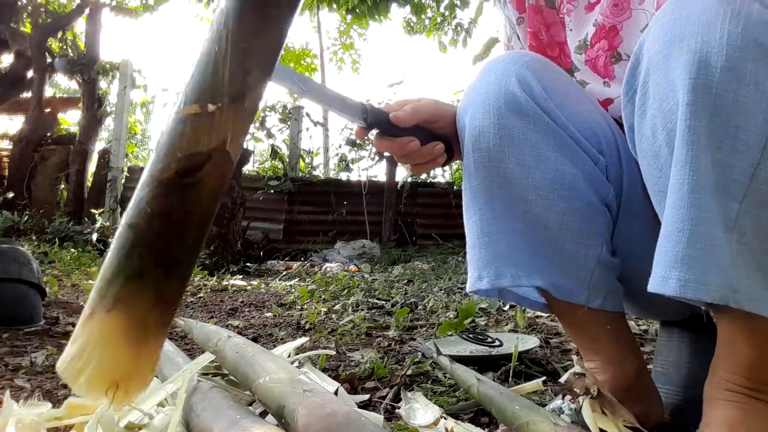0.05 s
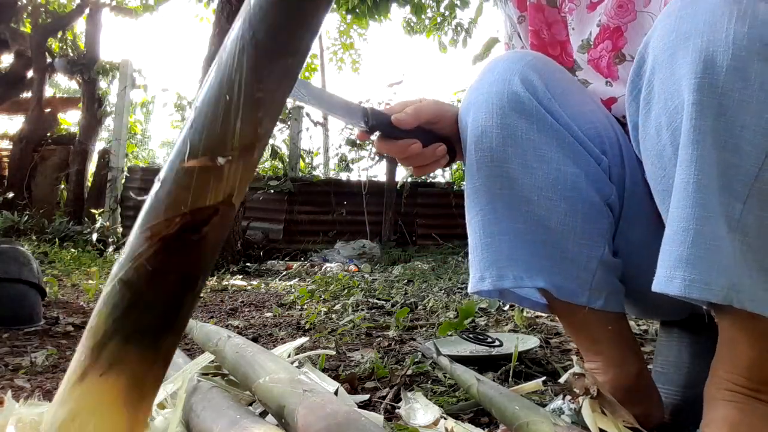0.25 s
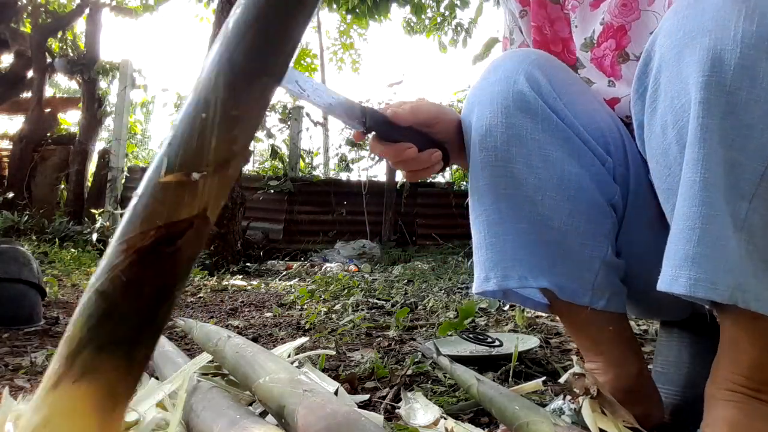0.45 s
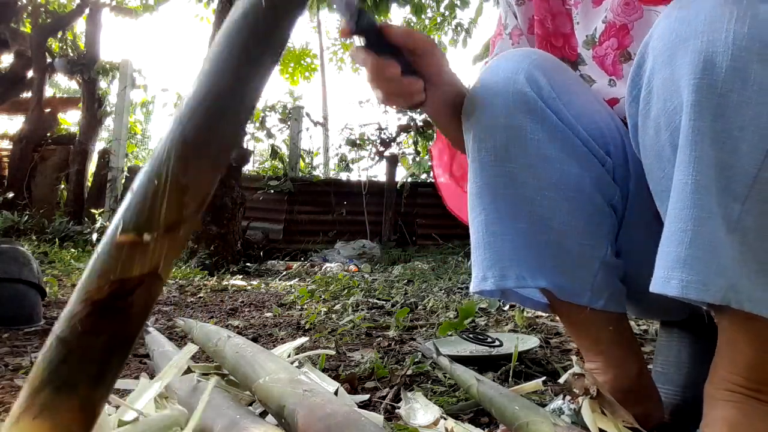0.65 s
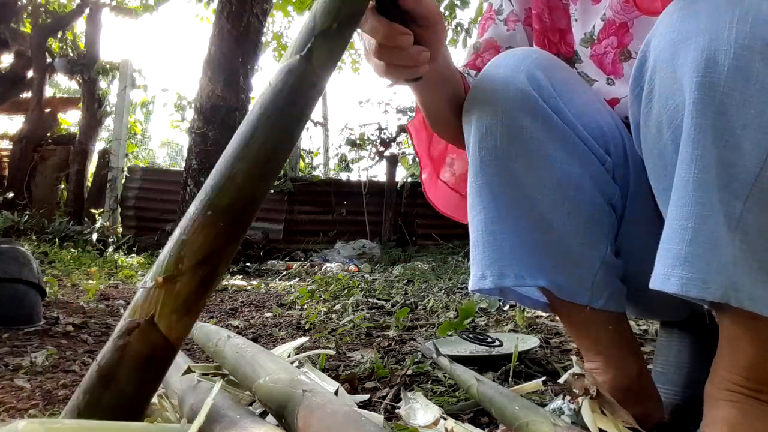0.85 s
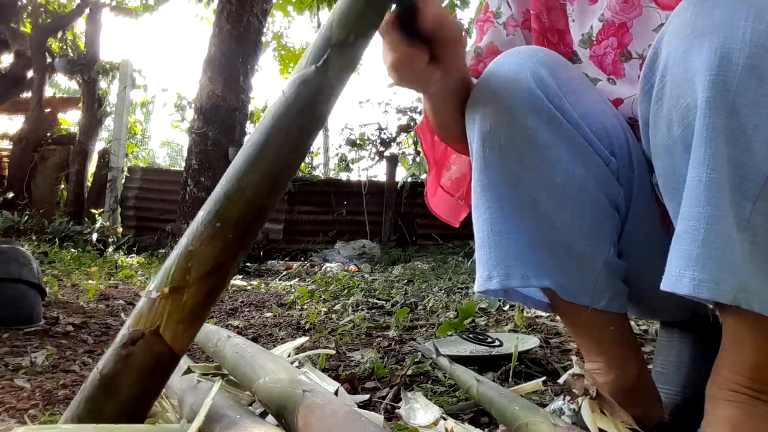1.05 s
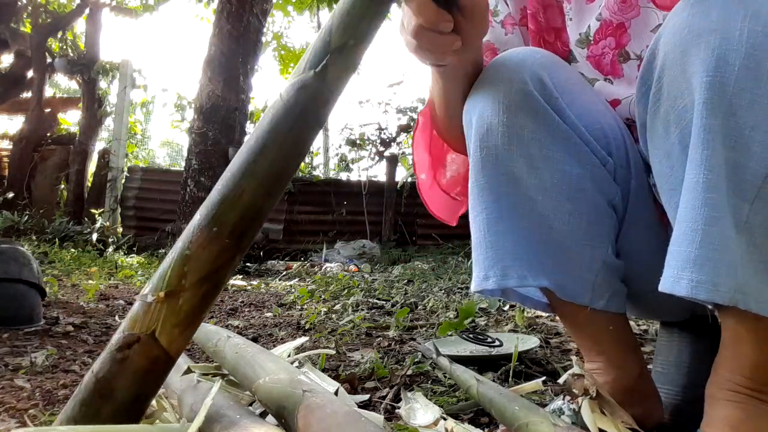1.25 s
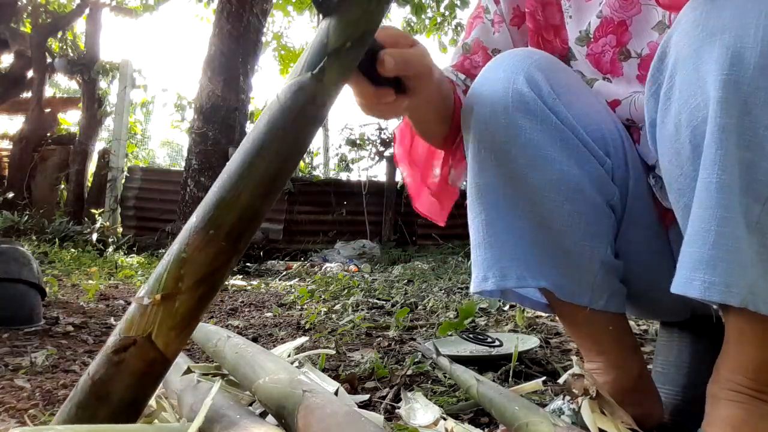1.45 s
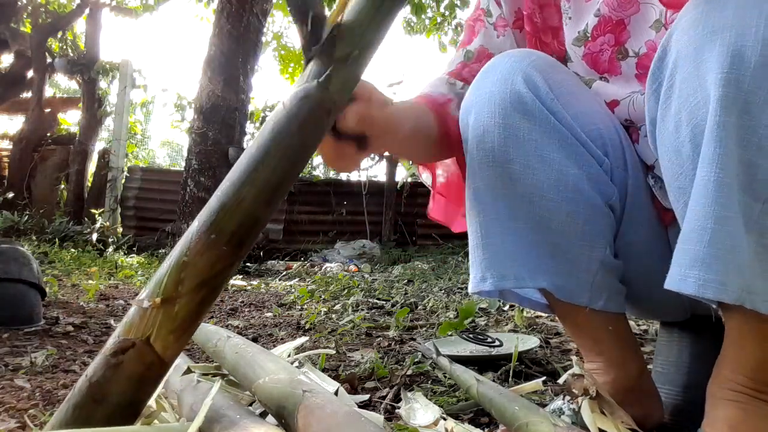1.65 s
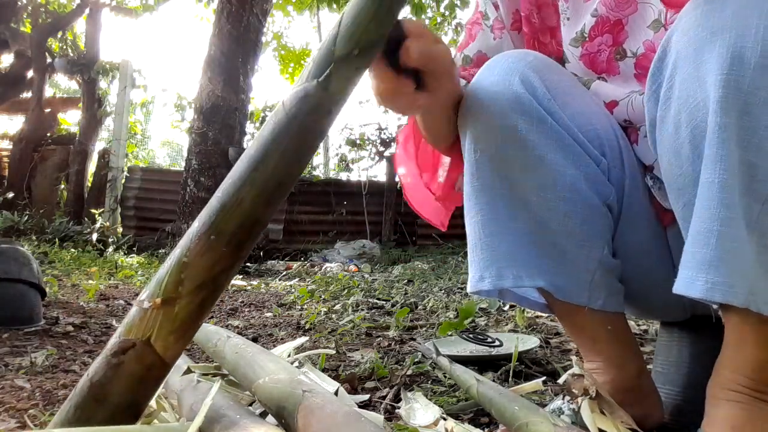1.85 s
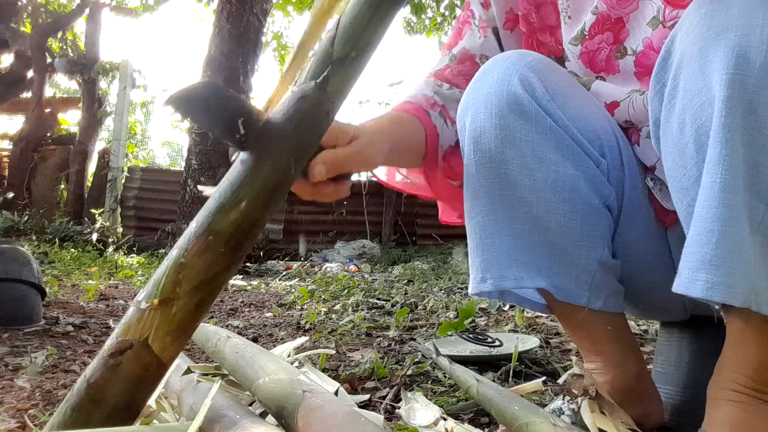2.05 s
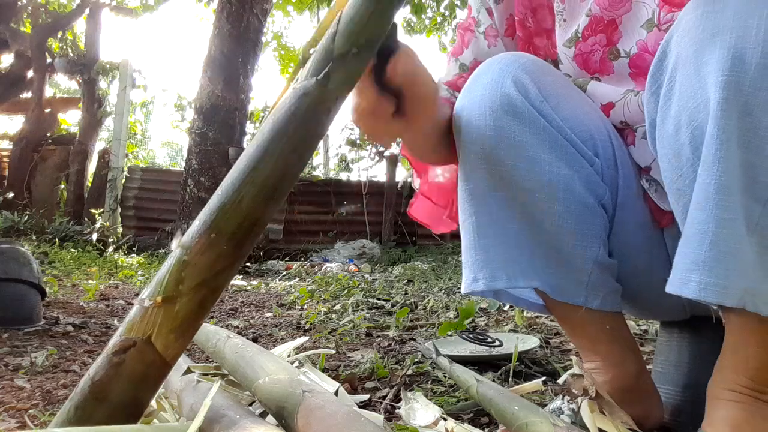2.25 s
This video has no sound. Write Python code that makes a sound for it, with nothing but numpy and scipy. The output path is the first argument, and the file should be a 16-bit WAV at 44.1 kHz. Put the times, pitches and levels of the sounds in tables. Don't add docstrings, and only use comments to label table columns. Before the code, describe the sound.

A knife cuts through a fresh bamboo shoot's husk in four crisp, crackling strokes outdoors

```python
import sys
import numpy as np
from scipy import signal
from scipy.fft import rfft, irfft, next_fast_len
from scipy.io import wavfile
from scipy.ndimage import map_coordinates

SR = 44100
rng = np.random.default_rng(int(sys.argv[2]) if len(sys.argv) > 2 else 0)


def log_audio(samples):
    frames = np.atleast_2d(samples).T
    limited = np.clip(frames, -1, 1)
    pcm = np.round(limited * 32767).astype(np.int16)
    wavfile.write(sys.argv[1], SR, pcm)


def level_to_linear(level):
    exponent = np.asarray(level, float) / 20
    return 10 ** exponent


N = 100900
CUT_LAG_S = -.00004


def unit(x):
    return x / np.sqrt(np.mean(x ** 2) + 1e-20)


def along(points, hz):
    f, v = np.transpose(points)
    return np.interp(np.log(hz + 1), np.log(f + 1), v)


def curves(rows, outside=-140):
    s, *cols = np.transpose(rows)
    return [np.interp(np.arange(N) / SR, s, c, outside, outside) for c in cols]


def wobble(rate, size=N):
    knots = rng.standard_normal(size)
    return map_coordinates(knots, [np.arange(size) * min(rate, SR / 2) / SR])


def filtered(x, response):
    n = x.shape[-1]
    m = next_fast_len(n + 4096)
    return irfft(rfft(x, m) * response(np.fft.rfftfreq(m, 1 / SR)), m)[..., :n]


def causal(x, gain_db):
    floored_db = np.maximum(gain_db(np.fft.rfftfreq(2048, 1 / SR)), -90)
    cepstrum = irfft(np.log(level_to_linear(floored_db)))
    cepstrum[1:1024] *= 2
    cepstrum[1025:] = 0
    impulse = irfft(np.exp(rfft(cepstrum)))
    return signal.fftconvolve(x, impulse[None], axes=1)[:, :x.shape[1]]


def placed(x, pan_db, lag_s):
    side = np.array([[.5], [-.5]])
    return filtered(x, lambda hz: np.exp(-2j * np.pi * hz * lag_s * side)) * level_to_linear(pan_db * side)


def rush(spectrum, alike):
    def response(hz):
        turn = np.arccos(np.clip(along(alike, hz), -1, 1)) / 2
        return level_to_linear(along(spectrum, hz)) * [np.cos(turn), np.sin(turn)]

    mid, side = filtered(rng.standard_normal((2, N)), response)
    return unit(np.array([mid + side, mid - side]))


def crackle(per_s, spread_db, slip_db, clump_db, share, diffuse_db):
    draw, noise = rng.random((3, N)), rng.standard_normal((3, N))
    size_db = np.minimum(-spread_db * np.log(draw[2] + 1e-9), 2.5 * spread_db)
    spikes = (draw[0] < per_s / SR) * np.sign(draw[1] - .5) * level_to_linear(size_db)
    slip, share = level_to_linear(slip_db * wobble(1500)), np.clip(share, 0, 1)
    near = np.sqrt(1 - share) * unit(spikes) + np.sqrt(share) * unit(slip * noise[0])
    apart = unit(filtered(slip * noise[1:], lambda hz: np.sqrt(hz / (hz + 600))))
    return unit(level_to_linear(clump_db * wobble(250)) * (near + level_to_linear(diffuse_db) * apart))


def ambience():
    # (time [s], level [dB])
    shake_level = [(0, -82.5), (1.18, -73), (1.25, -64.5), (1.3, -75), (1.4, -58.5), (1.48, -58),
                   (1.54, -66), (1.62, -72), (1.68, -58), (1.78, -67), (2, -64.5), (2.05, -52.5),
                   (2.15, -68), (2.29, -70)]
    # (frequency [Hz], density [dB per Hz])
    ground = [(25, -41), (40, -13.5), (54, -1), (75, -9.5), (200, -22.5), (400, -43)]
    # (frequency [Hz], density [dB per Hz])
    far_colour = [(41, -31.5), (70, -7), (96, -9.5), (161, -13.5), (300, -19.5), (463, -26.5),
                  (3800, -37.5), (4940, -63), (8360, -120)]
    # (frequency [Hz], correlation [-])
    far_alike = [(60, 0.94), (240, 0.13), (950, 0.084)]
    # (frequency [Hz], density [dB per Hz])
    hiss_colour = [(4000, -10), (5400, -3), (6200, -8), (8000, -3), (10500, -7), (13300, 1.5),
                   (16000, -4.5)]
    far_db, far_pan_db, hiss_db = -72.5, 1.5, -83
    shake = level_to_linear(curves(shake_level, outside=-80)[0]) * rush(ground, [(50, 0.89)])
    far = level_to_linear(far_db + wobble(10.96)) * rush(far_colour, far_alike)
    return shake + placed(far, far_pan_db, 0.00035) + level_to_linear(hiss_db) * rush(hiss_colour, [(9000, 0.24)])


def insects():
    # (frequency [Hz], density [dB per Hz])
    chorus = [(3000, -70), (4100, -35), (4460, -22), (4670, -7), (4810, 0), (4925, -6), (5090, -24),
              (5500, -43), (6500, -90)]
    chorus_db, pan_db, alike = -63, -2, 0.053
    pulse_per_s, pulse_db, swell_db = 83, 1.5, 1
    phase = 2 * np.pi * pulse_per_s * np.arange(N) / SR + 2 * wobble(3.3)
    pulse = level_to_linear(pulse_db * np.sin(phase) + swell_db * wobble(20))
    return placed(level_to_linear(chorus_db) * unit(pulse * rush(chorus, [(5000, alike)])), pan_db, .0001)


def husk():
    # (time [s], strength [dB], left over right [dB])
    rustle = [(.45, -92, -1), (.484, -69.5, -4), (.57, -71, -5), (.597, -57, -4), (.68, -60, -7),
              (.69, -53.5, -3), (.78, -55.5, -4.5), (.84, -50, -3.5), (.885, -54.5, -2), (.93, -65.5, -0.5),
              (1.2, -65.5, 0), (1.35, -66, 2), (1.62, -64, 4), (1.9, -60, 1.5), (1.96, -67, 4),
              (2.29, -62.5, 0.5)]
    # (frequency [Hz], gain [dB])
    husk_colour = [(150, -61), (400, -8.5), (1200, -10), (2500, -9.5), (4000, 1), (7500, -4), (11500, -8),
                   (15800, -4)]
    # (time [s], level [dB])
    rub = [(.7, -74.5), (.78, -67.5), (.85, -58), (.9, -74.5), (.95, -84), (1.1, -86), (1.155, -63),
           (1.2, -79.5)]
    # (frequency [Hz], width [Hz], level [dB])
    hollow = [
        (727, 460, 1),
        (1080, 610, 3.5),
    ]
    body_hz, body_grows = 5900, 0.42
    strength_db, pan_db = curves(rustle)
    pan_db = np.clip(pan_db, -8, 8)
    fine = unit(causal(crackle(2000, 3, 2, 1, .9, -2), lambda hz: along(husk_colour, hz)))
    body = filtered(fine, lambda hz: 1 / (1 + (hz / body_hz) ** 4))
    fine = fine - body * (1 - level_to_linear(body_grows * (strength_db - strength_db.max())))
    fine = placed(fine, 0, .0001) * level_to_linear(strength_db + 1.2 * wobble(40) + pan_db * [[.5], [-.5]])

    def stem(f):
        modes = [level_to_linear(db) * 1j * f * w / (c * c - f * f + 1j * f * w) for c, w, db in hollow]
        return sum((-1) ** k * mode for k, mode in enumerate(modes))

    palm = unit(filtered(crackle(600, 2, 1.8, 1.5, 0.8, 1.5), stem))
    return fine + level_to_linear(curves(rub)[0]) * palm


def thuds():
    thud_s = [.558, .565, 2.012, 2.011, 2.195, 1.857, 2.042, 2.08, 2.115, 2.194, 2.012]
    thud_q = [1, 1.2, 3, 4, 1.3, 1, 3, 3, 2, 1.2, 3]
    # (peak level [dB], frequency [Hz], t60 [s])
    knocks = [(-57, 280, .06), (-67.5, 550, 0.06), (-52, 213.4, 0.037), (-50.5, 483, 0.03),
              (-54.5, 1160, 0.062), (-57.5, 660, 0.07), (-58, 462, 0.066), (-58.5, 373, 0.02),
              (-65, 200, .12), (-59.5, 270, .04), (-45.5, 1200, 0.074)]
    # (start [s], length [s], level [dB], from [Hz], to [Hz])
    moan = (1.16, .16, -84, 760, 690)
    free_ring = 1.5
    out, t = np.zeros((2, N + SR)), np.arange(SR // 8) / SR
    for s, q, (db, c, t60) in zip(thud_s, thud_q, knocks):
        noise = rng.standard_normal((3, len(t)))
        ringing = free_ring * np.sqrt((q - 1) * c / SR) * 2 * np.sin(2 * np.pi * c * t)
        puff = (noise[0] + .5 * noise[1:] + ringing) * level_to_linear(-60 * t / max(t60, .01))
        knock = filtered(puff, lambda f: (1j * f * c / q / (c * c - f * f + 1j * f * c / q)) ** 2)
        out[:, round(s * SR):][:, :len(t)] += level_to_linear(db) * knock / np.abs(knock).max()
    s, length, db, from_hz, to_hz = moan
    u = np.clip((np.arange(N) / SR - s) / length, 0, 1)
    pitch_hz = from_hz + (to_hz - from_hz) * u + 14 * wobble(78)
    note = np.sin(2 * np.pi * np.cumsum(pitch_hz) / SR)
    swell = level_to_linear(db + 3.9 * wobble(31.3)) * np.sqrt(np.sin(np.pi * u).clip(0))
    return (out[:, :N] + swell * note) * level_to_linear([[1.5], [-1.5]])


def snaps():
    # (time [s], peak [dB], ring t60 [s], tilt [dB per octave], left over right [dB])
    fibres = [(.687, -42, 0.014, -4, -1.5), (0.7856, -29, 0.014, 8, -0.5), (0.792, -44, 0.017, 0, -3),
              (0.839, -20, 0.007, 2, -4), (0.874, -35, 0.027, 5.5, 5), (1.24, -48.5, 0.11, 9, 5),
              (1.467, -38.5, 0.018, 1.5, 0.5), (1.4725, -36, 0.012, 2.5, 5.5),
              (1.6767, -15, 0.039, 1.5, 5.5), (1.7249, -22.5, 0.011, -3.5, 6),
              (1.8576, -34, 0.014, -3, 2.5), (2.105, -34, 0.0078, -3, 3.5), (2.1956, -29.5, 0.043, 3, 1.5),
              (2.2012, -37.5, 0.01, 3, 3.5)]
    # (frequency [Hz], gain [dB])
    snap_colour = [(100, -70), (400, -36), (1000, -20), (2500, -9), (4700, 0), (8000, -2), (12000, -3),
                   (16000, -5)]
    rise_share = .04
    out, t = np.zeros((2, N + SR)), np.arange(SR // 20) / SR
    for s, db, t60, tilt_db, pan_db in fibres:
        noise, ring_s = rng.standard_normal((3, len(t))), max(t60, .002)
        envelope = level_to_linear(-60 * t / ring_s) * (1 - np.exp(-t / (rise_share * ring_s)))
        burst = (noise[0] + .5 * noise[1:]) * envelope
        burst = causal(burst, lambda hz: along(snap_colour, hz) + tilt_db * np.log2(hz / 5000 + .2))
        burst = placed(burst / np.abs(burst).max(), pan_db, -.00003 * pan_db)
        out[:, round(s * SR):][:, :len(t)] += level_to_linear(db) * burst
    return out[:, :N]


def cracks():
    # (time [s], peak [dB], ring [Hz], left over right [dB])
    tough = [(1.0979, -33, 7200, 2), (1.1117, -32, 8800, -1), (1.1148, -32, 7100, 1),
             (1.1189, -33, 7500, -1), (1.1207, -33, 8600, 2), (1.3723, -33, 10200, 3),
             (1.3746, -28, 10500, 4), (1.3768, -29, 5000, 3), (1.3804, -28, 10600, 7),
             (1.3844, -28, 12000, 4), (1.3869, -28, 11000, 4), (1.3887, -29, 11500, 2),
             (1.3952, -32, 12300, 1), (1.4094, -26, 14100, 2), (1.415, -30, 13200, 4),
             (1.4214, -31, 6800, 1), (1.6776, -18, 12100, 2), (1.6802, -19, 8600, 2),
             (1.6822, -15, 5900, 3), (1.6865, -21, 5300, 2), (1.6932, -24, 14800, 0),
             (1.6972, -28, 4400, 2), (1.7088, -24, 4800, 2), (1.7122, -21, 5300, 2), (1.7139, -16, 4500, 2),
             (1.7175, -20, 4600, 0), (1.7195, -20, 4400, 2), (1.7257, -24, 4300, 0), (2.0142, -14, 4600, 1),
             (2.0166, -16, 3200, 1), (2.0182, -16, 6100, 0), (2.0201, -18, 6500, 3), (2.0246, -16, 4700, 2),
             (2.0311, -17, 2900, 1), (2.0333, -17, 4600, 2), (2.0365, -21, 10300, 2),
             (2.0397, -20, 5200, 3), (2.0439, -17, 4600, 1), (2.0466, -20, 4700, 0), (2.0491, -17, 7200, 1),
             (2.0519, -21, 7600, 0), (2.0546, -16, 6200, 0), (2.1943, -35, 4700, 2),
             (2.1989, -36, 4700, -1), (2.2006, -35, 4800, -1), (2.203, -39, 6700, 1),
             (1.8581, -35, 4500, -1), (1.8607, -39, 12300, 2)]
    trim_db, ring_s, edge_share = .5, .00028, .7
    low_hz = 2200
    out, t = np.zeros((2, N + SR)), np.arange(SR // 200) / SR
    for s, db, ring_hz, pan_db in tough:
        noise, fade = rng.standard_normal((3, len(t))), np.exp(-t / ring_s)
        edge = np.diff(noise[0] + .5 * noise[1:], prepend=0) * fade ** 2 / 2
        ring = np.sign(noise[0, 0]) * np.sin(2 * np.pi * ring_hz * t) * fade
        tick = filtered(ring + edge_share * edge, lambda hz: (1j * hz / (low_hz + 1j * hz)) ** 2)
        tick = placed(tick / np.abs(tick).max(), pan_db, CUT_LAG_S)
        out[:, round(s * SR):][:, :len(t)] += level_to_linear(db + trim_db) * tick
    return out[:, :N]


def force(bites, forces, on_s, settle):
    rise_db, release_t60 = 20, .028
    t = np.arange(N) / SR
    scrape_db, back_db, t60 = settle
    end = sum(bites[-1])
    scrape = level_to_linear(scrape_db) * (t > on_s) * (t < end)
    gain = scrape + level_to_linear(back_db - 60 * np.abs(t - end) / t60) * (t > end)
    for (s, rise, hold), (first_db, last_db) in zip(bites, forces):
        db = np.interp(t, [s, s + rise, s + rise + hold], [first_db - rise_db, first_db, last_db])
        release_db = -60 * np.maximum(t - s - rise - hold, 0) / release_t60
        gain = np.hypot(gain, level_to_linear(db + release_db) * (t > s))
    return gain


def knife():
    # (start [s], rise [s], hold [s])
    bites = [
        [(1.0966, .0015, .026)],
        [(1.369, .005, .032), (1.4075, .002, .017)],
        [(1.6762, .0015, .022), (1.697, .016, .009)],
        [(2.0095, .0045, .006), (2.019, .002, .035)],
    ]
    # (first level [dB], last level [dB])
    forces = [
        [(-39, -36)],
        [(-33.5, -35.5), (-35, -38.5)],
        [(-31, -29.5), (-23.5, -29)],
        [(-16, -22), (-23.5, -25.5)],
    ]
    set_on_s = [1.08, 1.355, 1.652, 1.98]
    # (first scrape [dB], husk springing back [dB], its t60 [s])
    settle = [
        (-56, -50, 0.27),
        (-55.5, -52.5, 0.21),
        (-48.5, -39, 0.21),
        (-52, -38, 0.23),
    ]
    # (frequency [Hz], density [dB per Hz])
    first_colour = [(240, -60), (400, -44), (1100, -19.5), (1770, -31), (3530, -11), (5500, -9.5),
                    (7600, -5.5), (15600, -6.5)]
    second_colour = [(250, -39), (500, -25), (2000, -13), (4700, -5.5), (6500, -5), (9200, -8.5),
                     (12000, 0.5), (15600, -9)]
    third_colour = [(240, -46), (400, -22.5), (683, -25), (1400, -22), (2290, -16.5), (4560, -8),
                    (9070, -12.5), (15500, -8.5)]
    fourth_colour = [(250, -48), (750, -23), (1500, -15.5), (2300, -10.5), (4600, -2.5), (9000, -7),
                     (12000, -3.5), (15500, -7)]
    colours = first_colour, second_colour, third_colour, fourth_colour
    swing = 3
    out = np.zeros((2, N))
    for *cut, colour in zip(bites, forces, set_on_s, settle, colours):
        tear = crackle(per_s=3500, spread_db=3, slip_db=2.2, clump_db=1.3, share=.8, diffuse_db=0)
        tear = unit(causal(tear, lambda hz: along(colour, hz)))
        out += force(*cut) * swing * np.tanh(tear / swing)
    return placed(out, 1.5, CUT_LAG_S)


def echoes(x):
    t = np.arange(SR // 5) / SR
    tail = rng.standard_normal((2, len(t))) * level_to_linear(-60 * t / .04)
    return signal.fftconvolve(x, tail / np.linalg.norm(tail[0]), axes=1)[:, :N]


def scene():
    near = knife() + cracks() + snaps() + thuds()
    return near + level_to_linear(-13) * echoes(near) + husk() + insects() + ambience()


def low_pass(x):
    return signal.sosfilt(signal.butter(12, 16970, fs=SR, output="sos"), x)


def record(dry):
    top_hz, end_hz, edge_hz, above_db = 15820, 16900, 90, -38

    def step(hz, at_hz):
        return (1 + np.tanh((hz - at_hz) / edge_hz)) / 2

    mix = filtered(dry, lambda hz: level_to_linear(above_db * step(hz, top_hz)) * (1 - step(hz, end_hz)))
    return low_pass(mix)


dry = scene()
out = record(dry)
log_audio(out)
```